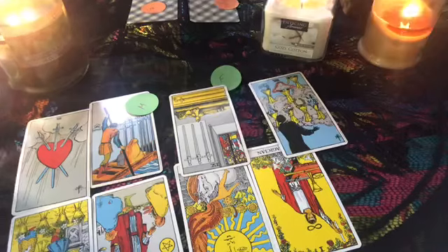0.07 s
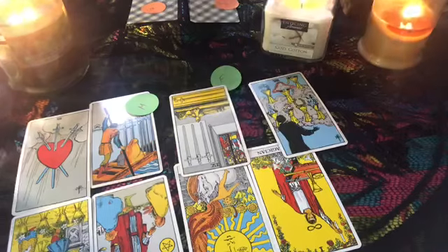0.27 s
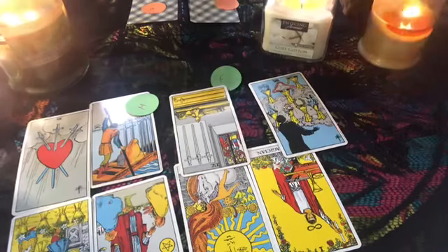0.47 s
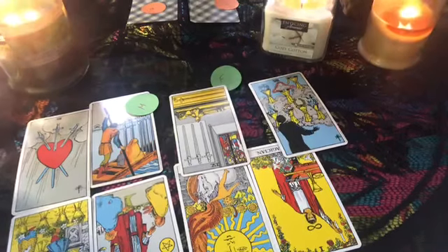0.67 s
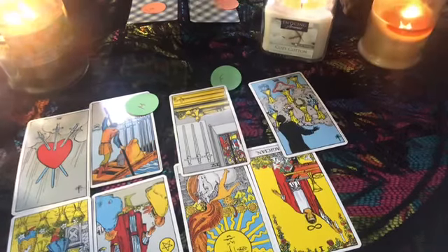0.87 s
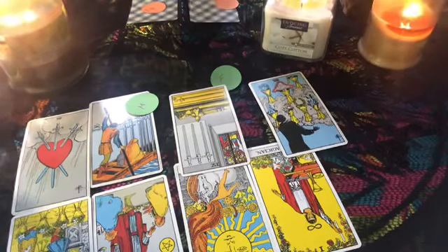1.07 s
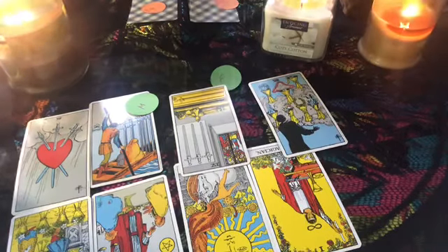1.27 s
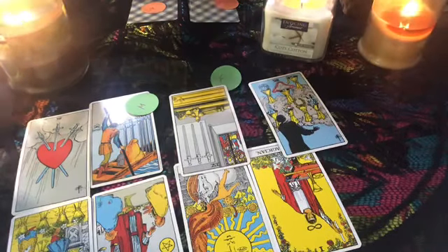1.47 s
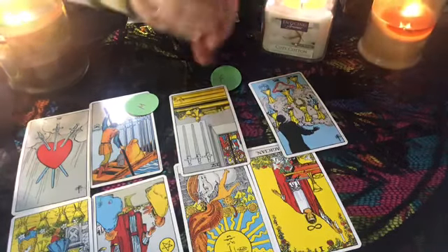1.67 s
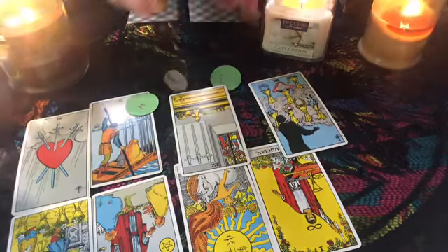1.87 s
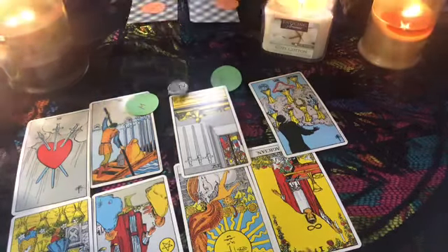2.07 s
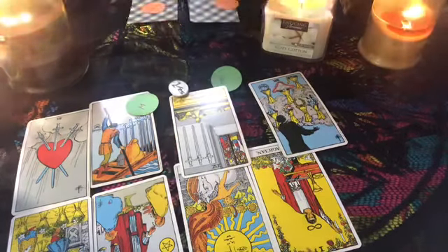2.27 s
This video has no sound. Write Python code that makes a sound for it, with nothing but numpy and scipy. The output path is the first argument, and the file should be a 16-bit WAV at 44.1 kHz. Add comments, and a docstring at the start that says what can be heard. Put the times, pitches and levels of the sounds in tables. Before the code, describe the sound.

A coin lands on a cloth-covered wooden table with one loud, bright smack after nearly two seconds of quiet hush, then small rim ticks and soft knocks follow; close microphone, quiet room, mono.

```python
"""Coin landing on a table

A coin smacks onto a cloth-covered wooden table in a quiet room, bounces once, then wobbles on its rim.
Before it come room hush, a faint tick, a low rumble and a rustle of cloth, all made of shaped noise.
The smack is short noise cracks, ringing surface modes and a dying noise tail. Clicks and rough noise
set the table modes ringing, rim ticks are bursts of noise with a short ring, and the coin rings as sines.
"""
import sys
import numpy as np
from scipy import signal
from scipy.fft import rfft, irfft
from scipy.io import wavfile
from scipy.ndimage import uniform_filter1d

SR = 44100
rng = np.random.default_rng(int(sys.argv[2]) if len(sys.argv) > 2 else 0)


def dump_mix(stems):
    """Bounce the given channels to the path in sys.argv[1] as a 16-bit WAV at rate SR."""
    frames = np.atleast_2d(stems).T  # one column per channel
    limited = np.clip(frames, -1, 1)  # hard clip at full scale
    pcm = np.round(limited * 32767).astype(np.int16)
    wavfile.write(sys.argv[1], SR, pcm)


N = 101915
T = np.arange(N) / SR   # time of each sample in seconds

# Tone of the room hush. Each row: frequency in Hz, relative strength in dB per Hz.
HUSH_SPECTRUM = [(15, -59), (25, -27), (45, -3), (85, 1), (165, -8), (235, -5.5), (300, -8.5), (620, -14),
                 (1000, -16), (1600, -18), (2300, -23), (4000, -27.5), (6200, -29), (8000, -33),
                 (11000, -36.5), (15600, -38)]
# Loudness of the hush. Each row: time in seconds, level in dB.
HUSH_LEVEL = [(0, -65.5), (1.1, -64.5), (1.5, -63), (1.8, -61.5), (2.0, -59), (2.1, -55), (2.31, -58)]
# Low rumble in the furniture. Each row: time in seconds, level in dB.
RUMBLE_LEVEL = [(1.1, -79), (1.146, -96), (1.186, -71.5), (1.422, -64), (1.46, -73), (1.53, -56.5),
                (1.628, -83), (1.76, -55.5), (1.938, -57.5), (1.972, -78), (2.07, -58), (2.31, -75)]
# Tone of the cloth rustle. Each row: frequency in Hz, relative strength in dB per Hz.
RUSTLE_SPECTRUM = [(1180, -28), (2000, 1.5), (3580, 1), (4040, -5), (6810, -6), (8360, -13), (15500, -17)]
# Loudness of the rustle. Each row: time in seconds, level in dB.
RUSTLE_LEVEL = [(1.49, -90), (1.53, -74), (1.57, -73), (1.61, -70.5), (1.64, -75), (1.67, -82), (1.8, -87),
                (1.82, -120)]
# Rim ticks. Each row: start in seconds, relative level in dB, time for the burst to die by 60 dB
# in seconds, level of the sharp edge in dB relative to the tick.
RIM_TICKS = [(1.7979, -38, 0.016, -17), (1.8002, -38, 0.017, -17), (2.049, -38, .03, -11),
             (2.054, -33.5, 0.019, 8), (2.0665, -37, .025, 3), (2.077, -54, 0.014, -6),
             (2.127, -42.5, 0.019, 0), (2.134, -38.5, 0.046, -5), (2.137, -41.5, 0.028, -8),
             (2.144, -44, .02, -8), (2.1464, -43.5, .025, -4.5), (2.1973, -47.5, 0.028, 9),
             (2.203, -46, 0.015, -4), (2.2081, -37, 0.022, -6), (2.213, -48, .02, -8),
             (2.2165, -38, 0.024, -5), (2.2515, -46, 0.017, 2), (2.254, -48.5, .03, 0),
             (2.258, -48, 0.028, -5), (2.267, -43, 0.028, -2), (2.2738, -42.5, 0.023, -3),
             (2.2943, -43, 0.016, -4), (2.304, -45, 0.019, -11)]
# Tone of the tick bursts and of the rolling rim. Each row: frequency in Hz, relative strength in dB per Hz.
RIM_SPECTRUM = [(880, -40), (1500, -4.5), (3520, 3.5), (4880, -8), (5400, -13), (6570, -11.5), (7270, -9),
                (11500, -24.5), (13800, -19.5)]
# Rim rolling on cloth. Each row: time in seconds, level in dB.
ROLL_LEVEL = [(1.95, -54), (2.03, -70), (2.06, -61.5), (2.1, -74.5), (2.14, -64), (2.18, -69.5),
              (2.26, -69.5), (2.31, -79)]
# Thin ringing just before the smack. Each row: frequency in Hz, width of the resonance in Hz, full level in dB.
LEAD_IN_BANDS = [(2700, 830, -43.5), (3594, 350, -31), (5000, 200, -48.5), (8170, 120, -51)]
# Thuds into the table top. Each row: start in seconds, relative level in dB,
# hardness of the contact as a low-pass in Hz.
THUDS = [(1.822, -14, 1815), (1.829, -18.5, 500), (1.886, -24, 1310), (1.919, -32, 600), (1.934, -35, 400),
         (2.038, -39.5, 907), (2.049, -35.5, 880), (2.058, -40, 399), (2.066, -39, 500), (2.100, -46, 700),
         (2.15, -38, 2200), (2.2165, -33, 2200), (2.234, -38.5, 500), (2.274, -32.5, 2650),
         (2.293, -39, 800)]
# Strength of the coin grinding on the table. Each row: time in seconds, level of the rough push in dB
# before it is softened.
GRIND_LEVEL = [(1.821, -53.5), (1.845, -53), (1.87, -69), (1.9, -66.5), (1.94, -68), (1.97, -74.5),
               (2.0, -90.5), (2.03, -73.5), (2.06, -72), (2.09, -80), (2.13, -73), (2.18, -75.5),
               (2.23, -73.5), (2.255, -81.5), (2.31, -75)]
# Modes (natural tones) of the table top. Each row: frequency in Hz, relative level in dB,
# time to die by 60 dB in seconds.
TABLE_MODES = [(174.7, -5.5, 0.065), (234.5, 1, 0.093), (259.5, -7, 0.094), (315, -8, .05),
               (398, -11.5, .04), (520.8, -8.5, 0.11), (652, -4.5, 0.079), (797, -5, .07),
               (908, -11.5, .05), (981, -7, 0.078), (1235, -6.5, 0.073), (1450, -7.5, 0.056),
               (1634, -8.5, .05), (1816, -14.5, .04)]
# Contacts of the landing. Each row: start in seconds, relative level in dB.
CONTACTS = [(1.8212, -4), (1.8225, -8.5), (1.8243, -6.5), (1.8268, -11), (1.8295, -13), (1.833, -14.5),
            (1.839, -22), (1.8475, -24.5)]
# Tone of the smack. Each row: frequency in Hz, relative strength in dB per Hz.
SMACK_SPECTRUM = [(650, -45.5), (1100, -11), (1650, -4), (1860, -10), (2760, -1.5), (3190, 0), (4440, -5),
                  (6310, -7), (13000, -39)]
# How fast the smack first dies in the room. Each row: frequency in Hz, time to die by 60 dB in seconds.
SMACK_T60 = [(300, 0.17), (800, 0.14), (1600, 0.12), (3000, 0.089), (6000, .1), (9000, .1), (14000, .1)]
# Bright modes of the struck surface. Each row: frequency in Hz, relative level in dB,
# time to die by 60 dB in seconds.
SURFACE_MODES = [(1630, -7, 0.2), (2710, -4, 0.2), (2963, 12, 0.1), (3240, -21, 0.17), (3240, -12.5, 0.11),
                 (3677, -4.5, 0.27), (4330, 7, 0.11), (4600, 3, 0.039), (4610, -15, 0.072),
                 (5170, -19, 0.044), (5630, -22, 0.13), (5720, -5, 0.093), (6089, -6, 0.12),
                 (6406, -1, 0.15)]
# Coin modes, low then high. Each row: level at the landing in dB, time to die by 60 dB in seconds.
COIN_RINGS = [(-52, 0.73), (-31.5, .12)]
COIN_HZ = 7098, 14160


def from_db(db):
    """Turn dB into a gain."""
    return 10 ** (np.asarray(db) / 20)


def rms_one(x):
    """Scale a sound to an average strength (rms) of 1."""
    return x / np.sqrt(np.mean(x ** 2) + 1e-20)


def at_hz(points, hz):
    """Read a table between its rows, with frequency on a log scale."""
    table_hz, values = np.transpose(points)
    return np.interp(np.log(hz), np.log(table_hz), values)


def level(rows):
    """Gain over time from rows of seconds and dB; practically silent before the first row."""
    s, db = np.transpose(rows)
    return from_db(np.interp(T, s, db, left=-120))


def dying(s, t60):
    """Gain that starts at s and falls by 60 dB every t60 seconds."""
    return (T >= s) * from_db(-60 * np.maximum(T - s, 0) / t60)


def clicks(s, db):
    """Single-sample clicks at the given seconds and levels."""
    out = np.zeros(N)
    out[(np.asarray(s) * SR).astype(int)] = from_db(db)
    return out


def filtered(sound, order, hz, kind="low"):
    """Keep only the low, high or middle (band) part of a sound."""
    return signal.sosfilt(signal.butter(order, hz, kind, fs=SR, output="sos"), sound)


def white_noise():
    """Noise with equal strength at all frequencies."""
    return rng.standard_normal(N)


def coloured(spectrum):
    """Steady noise of the given tone, falling away outside the table; rms 1."""
    hz = np.maximum(np.fft.rfftfreq(N, 1 / SR), 1)
    low_edge = np.minimum(hz / spectrum[0][0], 1) ** 2
    high_edge = np.minimum(spectrum[-1][0] / hz, 1) ** 8
    gain = from_db(at_hz(spectrum, hz)) * low_edge * high_edge
    return rms_one(irfft(rfft(white_noise()) * gain, N))


def ring(push, hz, t60):
    """A resonance: a click of height 1 sets off a dying sine of about height 1."""
    r = from_db(-60 / (t60 * SR))   # loss per sample
    w = 2 * np.pi * hz / SR         # turn per sample
    # the tiny offset keeps the filter away from extremely small numbers
    return signal.lfilter([0, np.sin(w)], [1, -2 * r * np.cos(w), r * r], push + 1e-18)


def narrow(hz, width_hz):
    """Noise sent twice through one resonance; rms 1."""
    t60 = np.log(1000) / np.pi / width_hz
    once = ring(white_noise(), hz, t60)
    return rms_one(ring(once, hz, t60))


def hush():
    """Room hush: steady noise, strongest in the bass, with a slowly moving level."""
    return level(HUSH_LEVEL) * coloured(HUSH_SPECTRUM)


def faint_tick():
    """One faint tick: a short burst of noise around one frequency."""
    s, hz, db, t60 = .221, 5400, -63, .022
    return from_db(db) * narrow(hz, width_hz=3500) * dying(s, t60)


def rumble():
    """Rumble in the furniture: noise through a low resonance, swelling and fading."""
    return level(RUMBLE_LEVEL) * narrow(hz=95.4, width_hz=33)


def rustle():
    """Cloth rustle: bright noise that swells and fades."""
    return level(RUSTLE_LEVEL) * coloured(RUSTLE_SPECTRUM)


def rim():
    """Each rim tick is a sharp edge, a short ring and a gritty burst; the rolling rim hisses."""
    s, db, _, _ = np.transpose(RIM_TICKS)
    edge_t60_s, ring_hz, ring_t60_s, ring_db = 0.0087, 3400, 0.0063, -9.5
    bright = filtered(white_noise(), 1, [3500, 10000], "band")
    edges = bright * sum(from_db(tick_db + edge_db - 8.5) * dying(start, edge_t60_s)
                         for start, tick_db, _, edge_db in RIM_TICKS)
    knocks = from_db(ring_db) * ring(clicks(s, db), ring_hz, ring_t60_s)
    bursts = sum(from_db(tick_db - 8.5) * dying(start, t60) for start, tick_db, t60, _ in RIM_TICKS)
    grit = coloured(RIM_SPECTRUM) * (bursts + level(ROLL_LEVEL))
    return edges + knocks + grit


def lead_in():
    """Thin ringing just before the smack: narrow bands of noise that swell, hold and stop."""
    start_s, full_s, end_s = 1.803, 1.815, 1.821
    swell = np.interp(T, [start_s, full_s, end_s], [0, 1, 1], right=0)
    return swell * sum(from_db(db) * narrow(hz, width) for hz, width, db in LEAD_IN_BANDS)


def table():
    """Thuds push the table modes with soft clicks; grinding pushes them with rough noise."""
    pushes = [filtered(clicks([s], db - 7.5) + 1e-18, 2, hz) for s, db, hz in THUDS]
    pushes.append(level(GRIND_LEVEL) * filtered(white_noise(), 2, 600))
    # every push excites every mode a little differently
    spread = from_db(rng.normal(0, 2, (len(pushes), len(TABLE_MODES))))
    out = np.zeros(N)
    for k, (hz, db, t60) in enumerate(TABLE_MODES):
        mode_push = from_db(db) * spread[:, k] @ pushes
        out += (-1) ** k * ring(mode_push, hz, t60)   # neighbours swing in opposite directions
    return filtered(out, 4, 140, "high")


def smack_tail(noise):
    """The dense tail of the smack: each band of noise dies at its own speed, with a slower part below."""
    start = CONTACTS[0][0]
    age = np.maximum(T - start, 0)
    slow_db, slow_times, grain_db = -11, 2.73, 1.5
    tail_db, rise_s, fade_after_s, fade_db_per_s = -10.5, 0.00064, 0.14, 200
    edges_hz = 250 * 2 ** np.arange(0, 6.1, .5)   # half-octave bands
    tail = np.zeros(N)
    for k, (low, high) in enumerate(zip(edges_hz, edges_hz[1:])):
        band = filtered(noise[k % 2], 2, [low, high], "band")
        t60 = at_hz(SMACK_T60, np.sqrt(low * high))
        tail += band * (dying(start, t60) + from_db(slow_db) * dying(start, slow_times * t60))
    # the level flickers quickly, which makes the tail grainy
    grain = rms_one(uniform_filter1d(white_noise(), size=90))
    tail = tail * from_db(grain_db * grain)
    # after a while the tail falls faster
    extra_fall_db = fade_db_per_s * np.maximum(age - fade_after_s, 0)
    return tail * (1 - np.exp(-age / rise_s)) * from_db(tail_db - extra_fall_db)


def landing():
    """Sharp contacts crack and ring the struck surface, over a tail that dies in the room."""
    s, db = np.transpose(CONTACTS)
    noise = [coloured(SMACK_SPECTRUM), coloured(SMACK_SPECTRUM)]
    tail = smack_tail(noise)
    cracks = noise[0] * sum(from_db(d - 7.5) * dying(t, 0.0085) for t, d in CONTACTS)
    surface = np.zeros(N)
    for hz, mode_db, t60 in SURFACE_MODES:
        # each contact strikes each mode a little differently
        hit_db = db - 20.5 + mode_db + rng.normal(0, 1.5, len(s))
        surface += ring(clicks(s, hit_db), hz, t60)
    return filtered(tail + cracks + surface, 8, [300, 13800], "band")


def coin():
    """The landing rings both coin modes; later ticks ring the low one, damped by the cloth."""
    hit_s = CONTACTS[3][0]
    rings = sum(ring(clicks([hit_s], db), hz, t60) for hz, (db, t60) in zip(COIN_HZ, COIN_RINGS))
    later_ticks = [row for row in RIM_TICKS if row[0] > CONTACTS[0][0]]
    s, db, _, _ = np.transpose(later_ticks)
    ping_db, damped_t60_s = -30, 0.094   # level relative to the tick
    pings = ring(clicks(s, db + ping_db), COIN_HZ[0], damped_t60_s)
    return rings + pings


def scene():
    """Add all the sources into one channel."""
    background = hush() + faint_tick() + rumble() + rustle()
    return (background + rim() + lead_in() + table() + landing() + coin())[None]


def record(dry):
    """Cut the very top of the treble with a steep low-pass filter."""
    cutoff_hz, ripple_db, stop_db = 15650, .5, 60
    return signal.sosfilt(signal.ellip(10, ripple_db, stop_db, cutoff_hz, fs=SR, output="sos"), dry)


dry = scene()
out = record(dry)
dump_mix(out)
```